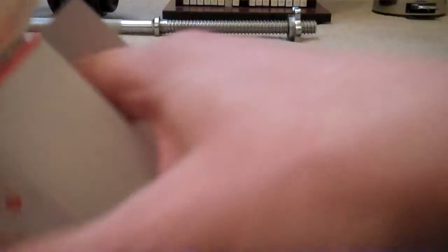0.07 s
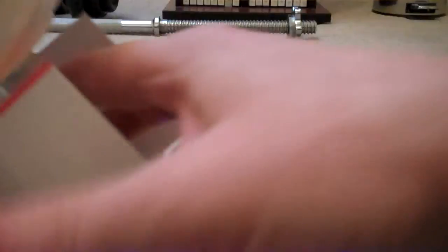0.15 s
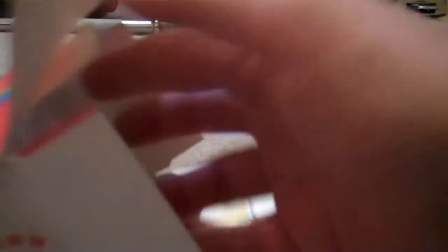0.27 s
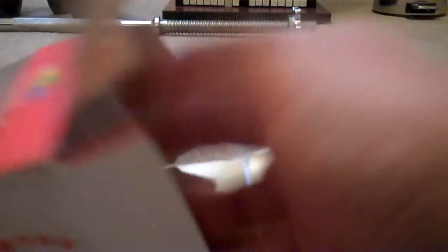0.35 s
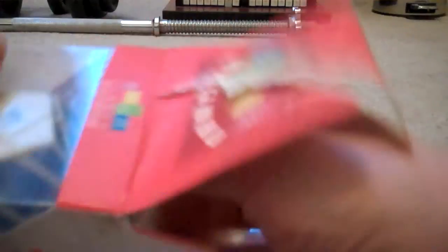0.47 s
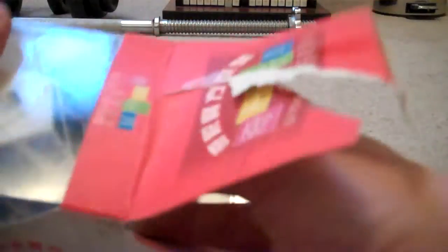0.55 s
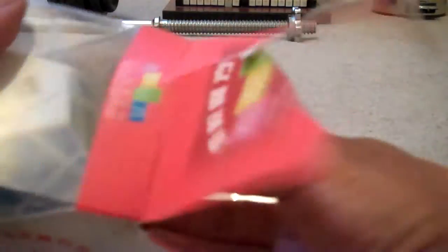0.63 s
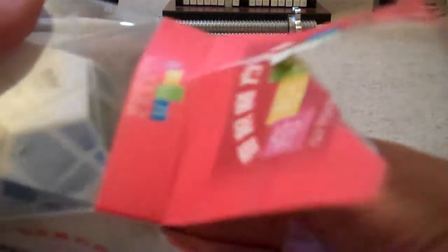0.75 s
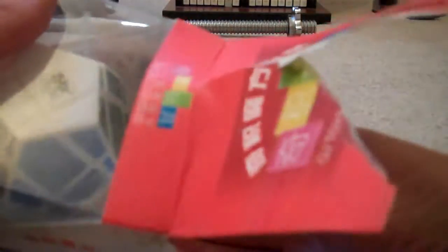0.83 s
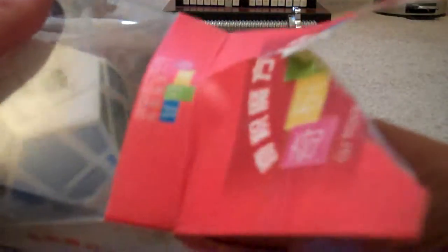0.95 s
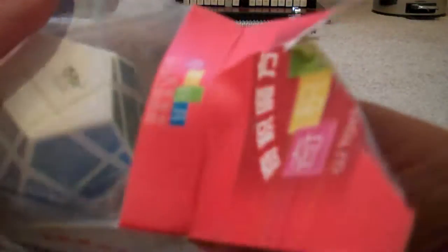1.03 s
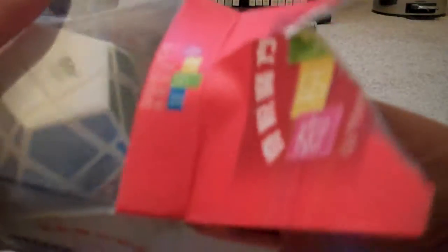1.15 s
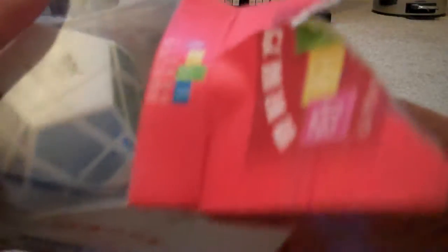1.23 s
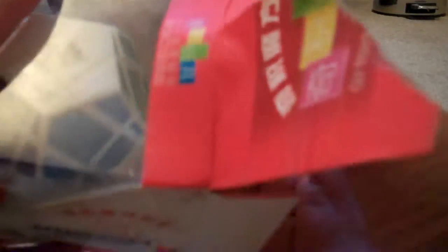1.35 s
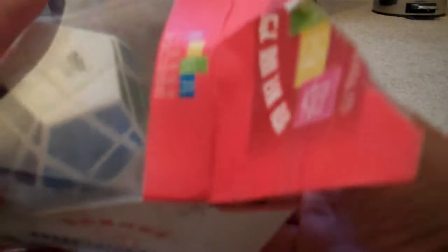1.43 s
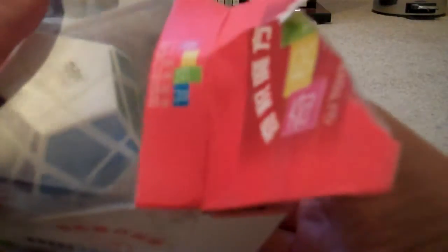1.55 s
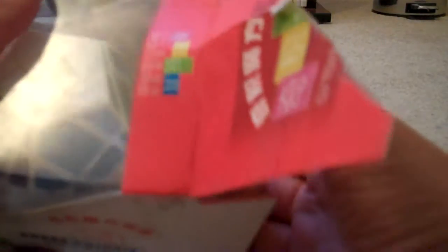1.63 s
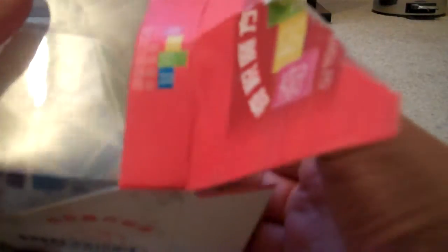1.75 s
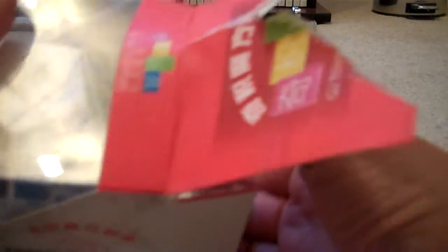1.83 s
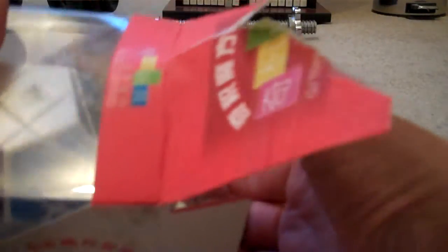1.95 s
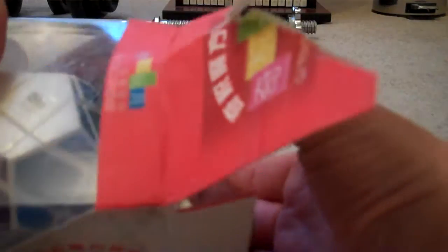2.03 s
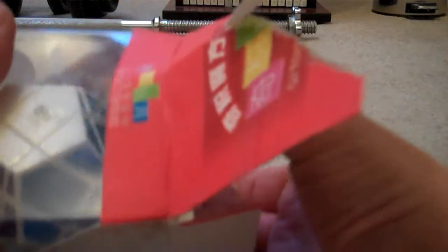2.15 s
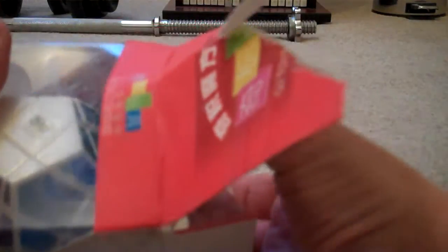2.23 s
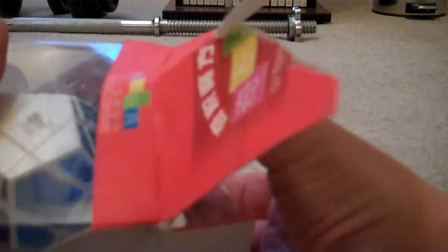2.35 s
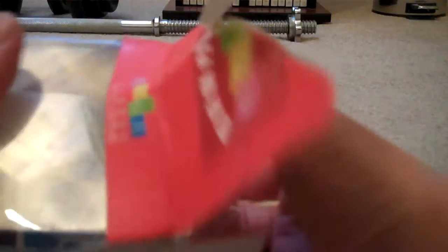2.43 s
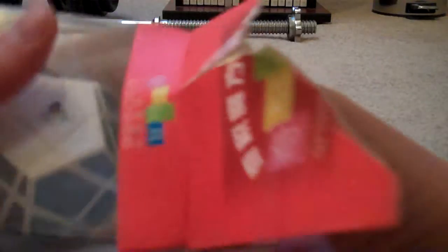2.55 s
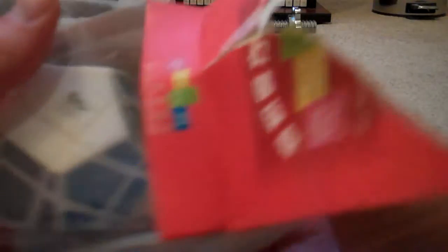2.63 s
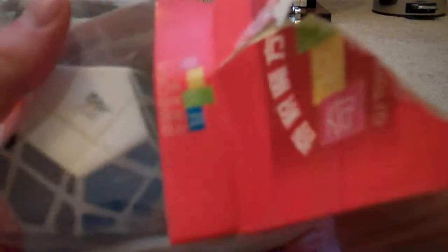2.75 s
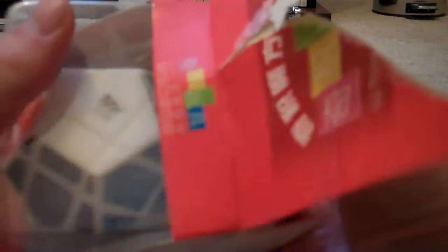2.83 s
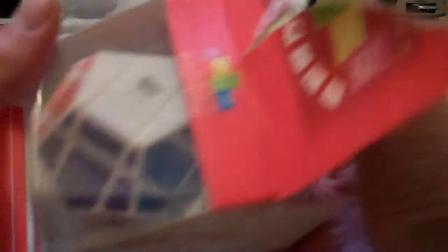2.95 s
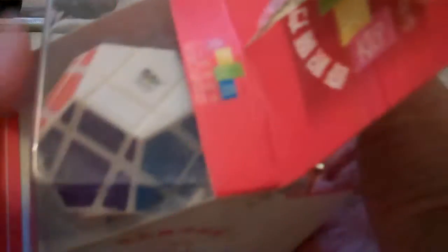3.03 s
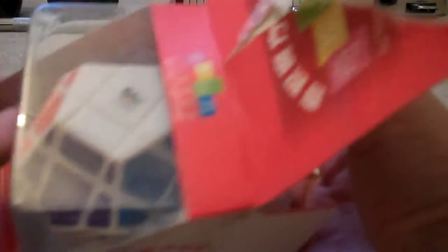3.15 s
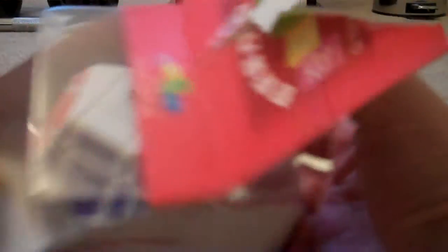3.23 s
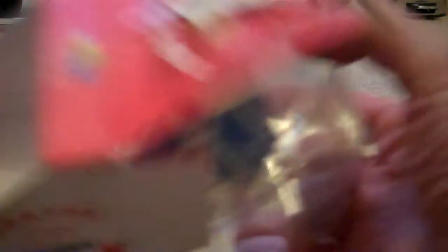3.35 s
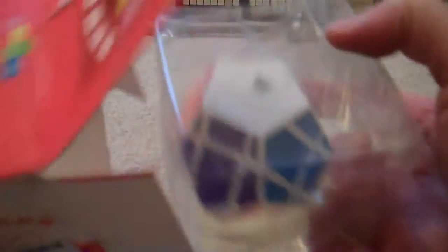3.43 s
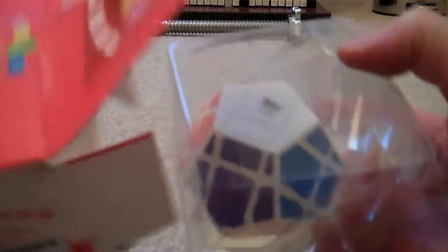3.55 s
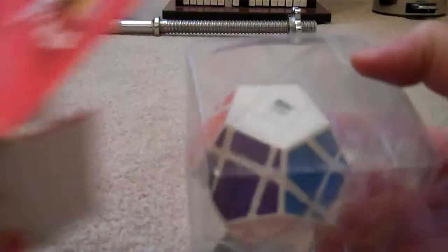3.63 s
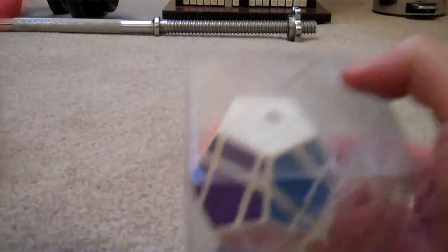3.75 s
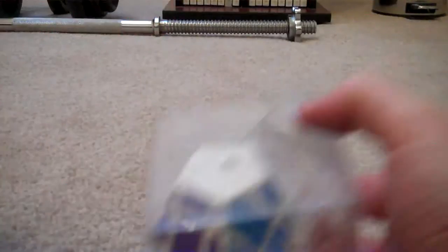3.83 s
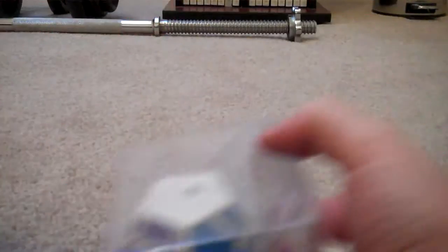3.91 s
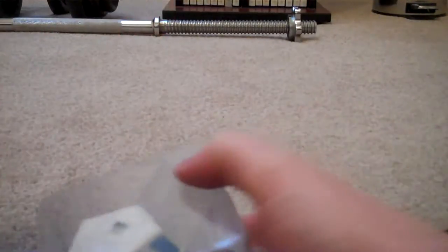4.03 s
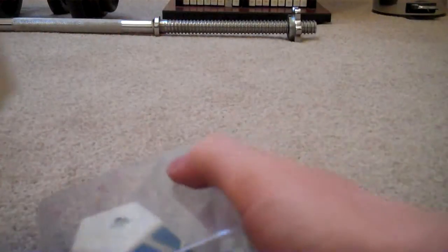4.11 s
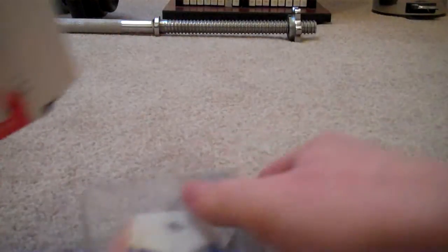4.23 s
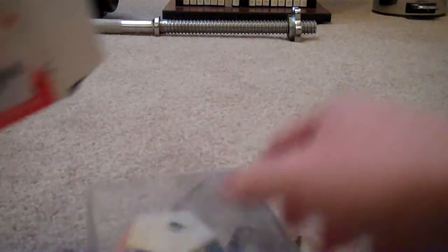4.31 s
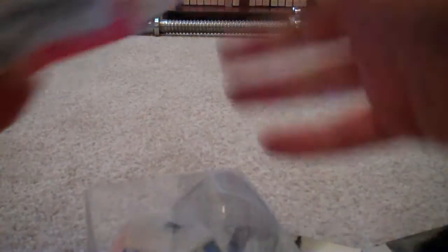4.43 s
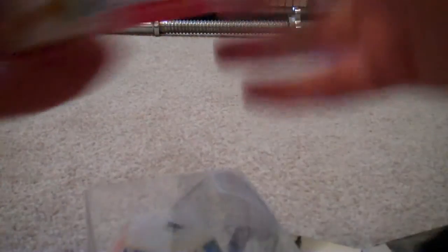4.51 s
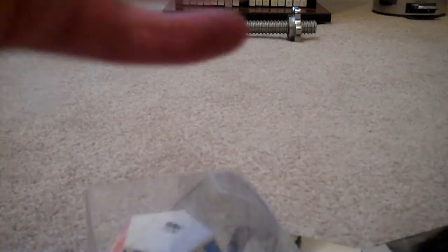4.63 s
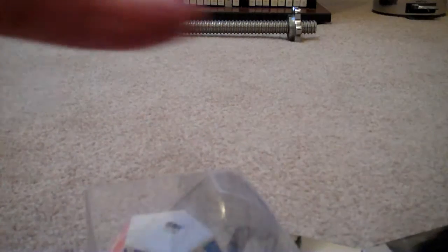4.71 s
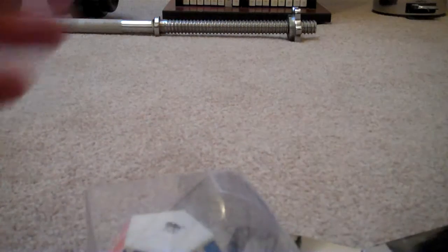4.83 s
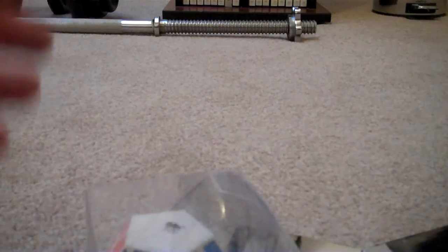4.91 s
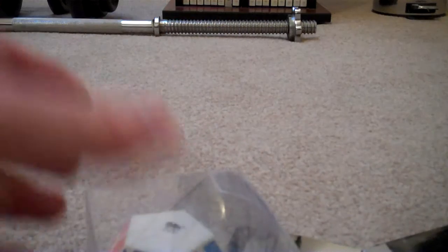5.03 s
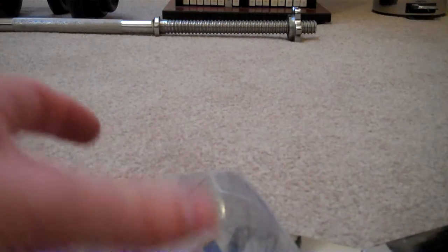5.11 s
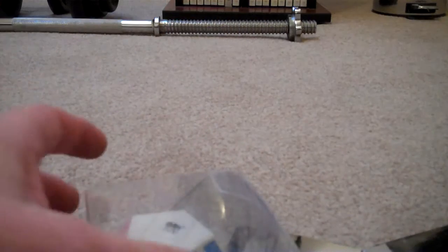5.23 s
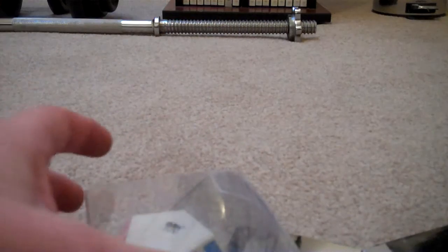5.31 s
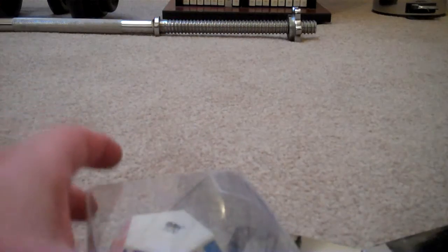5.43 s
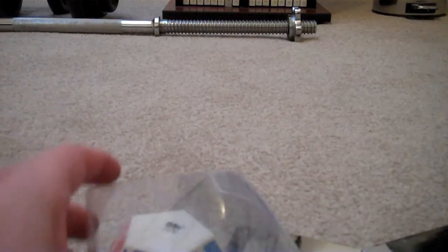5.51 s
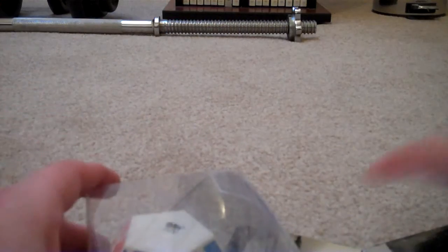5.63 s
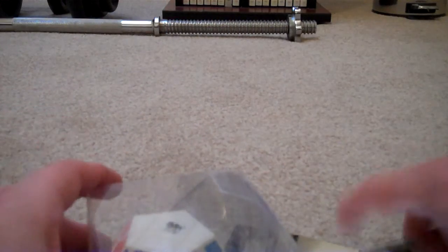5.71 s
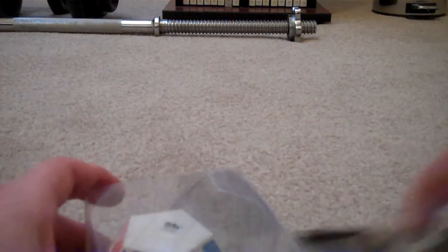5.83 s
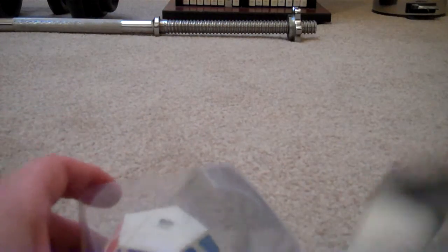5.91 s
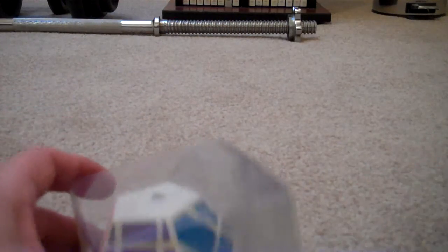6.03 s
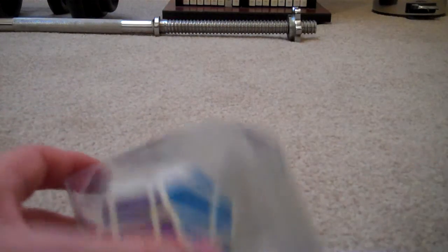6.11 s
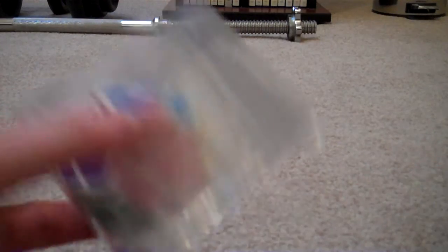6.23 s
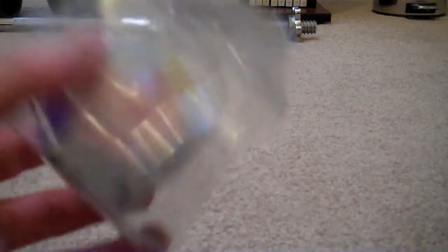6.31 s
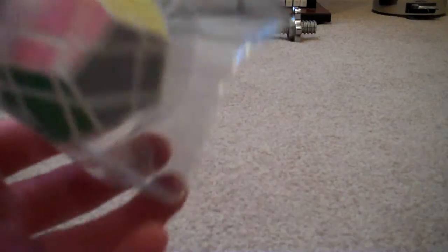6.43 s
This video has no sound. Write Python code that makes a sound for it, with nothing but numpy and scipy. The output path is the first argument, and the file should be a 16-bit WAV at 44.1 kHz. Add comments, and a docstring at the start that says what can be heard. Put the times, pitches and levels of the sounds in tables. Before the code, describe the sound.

Stiff card and crinkly plastic film rustle and snap very close up, some cracks overloading, then a light hollow puzzle bumps softly on carpet.

```python
"""A small carpeted room, heard close up: hands open a cardboard box and slide out a puzzle in a stiff plastic bag.
Card and film rustle as stick-slip noise through shifting resonances; creases pop as short decaying tones.
Folds snap, faint to very loud, as panel modes and noise bursts; the loudest overload the microphone.
The hollow puzzle is nudged on the carpet: damped modes behind soft contacts. A diffuse room tail answers."""
import sys
import numpy as np
from scipy import signal
from scipy.fft import rfft, irfft, next_fast_len
from scipy.io import wavfile
from scipy.ndimage import uniform_filter1d, map_coordinates

SR = 44100
rng = np.random.default_rng(int(sys.argv[2]) if len(sys.argv) > 2 else 0)


def store_wav(level_fs):
    """Save 16-bit WAV to argv[1]."""
    pcm = np.round(np.clip(np.atleast_2d(level_fs), -1, 1) * 32767)
    wavfile.write(sys.argv[1], SR, pcm.T.astype(np.int16))


N = 284886

# steady hush, its colour: f/Hz, density/dB per Hz
HUSH_COLOUR = [(20, -3.5), (60, -7.5), (250, -1), (600, -14), (2000, -19), (7000, -19), (14000, -18),
               (15000, -70)]
# decay of the room: f/Hz, t60/s
ROOM_DECAY = [(200, .29), (600, 0.48), (1400, 0.15), (4000, 0.33), (10000, 0.4)]
# colour of the room tail: f/Hz, level/dB
ROOM_COLOUR = [(100, -3), (300, 1), (480, -4), (630, 3), (880, 4), (1150, 0), (3500, -3), (6500, -6.5),
               (12000, -6.5)]
# likeness of the two microphone ports: f/Hz, correlation (1 = identical)
PORT_LIKENESS = [(100, 0.6), (500, 1.01), (1200, 0.85), (2500, 0.91), (4500, 0.54), (7000, 0.12),
                 (12000, -0.01)]
# tilt between the ports: f/Hz, left minus right/dB
PORT_BALANCE = [(100, 0.5), (300, 0.6), (2600, 0), (4600, -1), (5800, -6.5), (7200, 9), (8500, 10),
                (12000, 9.5)]
# the hands drift to the right, so the left port lags: t/s, lag/s
LEFT_LAG = [(0, 0), (3.4, 0), (3.7, .00002), (4.6, .00002), (5.1, .00006), (6.46, .00006)]
# a flap springs open and pushes air at the ports: t/s, level/dB
PUFFS = [(1.609, -8), (2.169, -24)]
# short resonant swells: the box cavity rings, an edge sings, the bag scuffs on the carpet:
# t/s, time to fall to 1/e/s, f/Hz, -6 dB width/Hz, level/dB
RESONANT_SWELLS = [(1.66, .05, 880, 260, -28), (2.853, 0.028, 2070, 600, -22), (4.24, .03, 215, 110, -35),
                   (4.802, 0.011, 2520, 200, -33), (4.816, .035, 6150, 250, -35),
                   (4.845, .008, 960, 200, -37), (5.33, .035, 115, 50, -49), (5.35, .04, 740, 60, -43),
                   (5.37, .05, 290, 50, -47)]
# card chatters over the film: start t/s, end t/s, slip rate/Hz, typical level/dB
CHATTER = [(1.984, 2.044, 225, -19)]
# modes of the hollow puzzle: f/Hz, level/dB, t60/s
PUZZLE_MODES = [(295, 0, .05), (420, -6, .028), (614, -3, .032), (735, -1, .035), (875, 1, .028),
                (1550, -6, .014), (2300, -7, .011)]
# the puzzle bumps in its bag: t/s, nominal peak/dB, centre f of the blow/Hz, highest f excited/Hz
KNOCKS = [(1.612, -6, 1000, 2800), (5.039, -33, 720, 1000), (5.085, -23, 700, 1000), (5.271, -29, 750, 950),
          (5.308, -19, 780, 950), (5.321, -23, 520, 900), (5.446, -18, 560, 900), (5.456, -20.5, 500, 900),
          (5.521, -28, 680, 900), (5.575, -28.5, 560, 910), (5.734, -32, 700, 900),
          (5.9225, -11.5, 1020, 2800), (6.33, -21, 1100, 2400), (6.405, -10, 440, 2400),
          (6.425, -20, 450, 2400)]
# swells of card and film noise: hand strokes, and a few that linger just after loud snaps: # t of the peak/s,
# half-width/s, card level/dB, film level/dB
RUSTLE_SWELLS = [(0.021, 0.035, -31.0, -25.9), (0.206, 0.012, -35.2, -38.7), (0.328, 0.015, -35.4, -28.5),
                 (0.442, 0.041, -35.5, -25.4), (0.629, 0.061, -38.5, -25.7), (0.823, 0.051, -38.5, -29.0),
                 (0.991, 0.042, -33.2, -20.5), (1.115, 0.025, -25.9, -21.9), (1.339, 0.016, -28.5, -23.7),
                 (1.639, 0.043, -28.1, -25.8), (1.816, 0.024, -26.3, -23.6), (2.05, 0.06, -25.6, -20.2),
                 (2.226, 0.048, -20.6, -20.3), (2.483, 0.029, -20.5, -17.4), (2.775, 0.052, -23.7, -22.3),
                 (2.849, 0.015, -14.7, -11.8), (2.983, 0.048, -30.5, -24.2), (3.348, 0.055, -21.8, -16.2),
                 (3.432, 0.016, -14.6, -17.0), (3.571, 0.015, -37.8, -33.3), (3.989, 0.022, -44.2, -39.1),
                 (4.084, 0.018, -30.3, -28.4), (4.212, 0.035, -31.6, -31.1), (4.311, 0.033, -33.6, -34.3),
                 (4.484, 0.03, -53.6, -43.4), (4.611, 0.025, -26.9, -19.3), (4.797, 0.026, -38.6, -29.9),
                 (5.104, 0.04, -40.9, -33.7), (5.205, 0.02, -52.2, -39.8), (5.311, 0.032, -47.5, -38.4),
                 (5.466, 0.034, -44.7, -38.8), (5.58, 0.022, -47.6, -37.8), (5.822, 0.041, -38.0, -31.5),
                 (5.956, 0.025, -44.6, -40.7), (6.24, 0.02, -43.9, -36.9), (6.355, 0.009, -33.4, -35.4),
                 (6.413, 0.024, -30.2, -32.4)]
# slow creep under the swells, fading once the bag is out of the box: t/s, card level/dB, film level/dB
CREEP = [(0.0, -37.6, -44.3), (0.26, -48.9, -43.1), (0.5, -39.5, -34.4), (1.3, -39.8, -38.1),
         (2.6, -47.5, -41.7), (3.2, -37.5, -34.3), (3.8, -57.3, -53.2), (6.46, -57.5, -53.4)]
# rubbing card, its colour: f/Hz, density/dB per Hz
CARD_RUB = [(25, -41), (90, -20), (180, -7.5), (400, -4), (560, -4.5), (860, 3), (1100, -0.5), (1600, 1),
            (2100, 3.5), (3000, -1), (3800, -3), (5500, -12), (9000, -70)]
# rubbing film, its colour: f/Hz, density/dB per Hz
FILM_RUB = [(1500, -53), (3000, -7.5), (3800, -4.5), (4800, -3.5), (5900, 3), (6600, 1.5), (7400, 1),
            (8600, -9.5), (10500, -19), (14000, -23.5), (14700, -59)]
# modes of the box panels: f/Hz, level/dB, t60/s for a 16 ms thump setting
PANEL_MODES = [(100, -11, .02), (205, -5.5, .026), (360, -2, .02), (530, 1, .017)]
# cracking card, its colour: f/Hz, density/dB per Hz
CARD_SNAP = [(200, -59), (500, -21), (680, -3.5), (880, 2.5), (1100, -5), (1900, 2.5), (2900, -3),
             (3600, -5), (5000, -14), (9000, -68)]
# ticking film, its colour: f/Hz, density/dB per Hz
FILM_SNAP = [(1500, -50), (3000, -6), (3800, -5.5), (5000, 1), (5900, 6), (7400, 1.5), (8700, -10),
             (11000, -19.5), (14000, -25.5), (20000, -65)]
# single folds and ticks, faint to very loud: t/s, thump level/dB, card level/dB, film level/dB
TIMED_FOLDS = [(.0212, -33, -27, -15), (.0257, -25, -21, -4), (.0297, -30, -25, 1), (.6554, -33, -32, -11),
               (.6653, -26, -14, 0), (.7653, -49, -27, -14), (.8068, -45, -19, -21), (.9411, -35, -20, -20),
               (.9902, -46, -25, -5), (1.2279, -14, -4, -7), (1.3068, -25, -7, -15),
               (1.3401, -37, -16, -19), (1.4322, -24, -22, -25), (1.4485, -24, -3, -2),
               (1.4719, -41, -11, -26), (1.5155, -55, -24, -17), (1.5435, -15, 2, 3), (1.6083, -13, 5, 5),
               (1.7678, -54, -16, -6), (1.816, -39, -18, -4), (1.8304, -40, -22, -12),
               (1.9005, -57, -29, -17), (2.05, -40, -10, -2), (2.0688, -28, -3, 4), (2.1498, -47, -40, -16),
               (2.1679, -18, 7, 6), (2.1889, -37, -13, -17), (2.23, -37, -16, -14), (2.2843, -46, -19, -12),
               (2.3833, -48, -19, -10), (2.4754, -46, -32, -7), (2.4891, -44, -11, -13),
               (2.6673, -27, -17, -21), (2.6855, -17, -3, 0), (2.8019, -47, -13, -13),
               (2.8698, -26, -5, -4), (3.0206, -47, -15, -21), (3.073, -29, -18, -19),
               (3.1105, -48, -27, -9), (3.132, -51, -30, -15), (3.1765, -54, -27, -13),
               (3.2075, -10, 0, -2), (3.307, -37, -13, -21), (3.369, -29, -12, -14), (3.3919, -37, -5, -12),
               (3.409, -30, -4, -20), (3.4166, -23, -16, -24), (3.4357, -27, -12, 4), (3.4455, -27, -5, -2),
               (3.565, -51, -35, -22), (3.5925, -42, -22, -15), (3.6556, -49, -34, -42),
               (3.7426, -63, -55, -33), (4.1115, -35, -25, -41), (4.2164, -19, -10, 0),
               (4.236, -27, -32, -18), (4.28, -29, -14, -15), (4.5967, -35, -19, -20),
               (4.8428, -49, -35, -31), (5.0448, -47, -33, -21), (5.0864, -40, -27, -22),
               (6.3287, -33, -22, -27)]

TOP_HZ = 16000
# a rustle swell is this far down at one half-width from its peak; the exponent rounds its top
SWELL_FALL_DB, SWELL_ROUNDNESS = 4, 1.5
# base decay of a fold at 0 dB of card, scaled for each layer; louder card rings longer
SNAP_BASE_T60_S, T60_DOUBLES_DB = .018, 55
# random folds: density, scatter, and levels over the rustle (thump, card, film)
RANDOM_FOLDS_PER_S, RANDOM_SCATTER_DB, RANDOM_FOLD_DB = 11, 2.5, (-10, 4, 6)


def amp(db):
    """Decibels to gain."""
    return 10 ** (np.asarray(db) / 20)


def unit(x):
    """Scale to rms 1."""
    return x / np.sqrt(np.mean(x ** 2) + 1e-20)


def along(points, hz):
    """Read (Hz, value) points on a log frequency axis."""
    f, value = np.transpose(points)
    return np.interp(np.log(hz + 1), np.log(f + 1), value)


def wobble(rate):
    """A smooth random curve with rate knots a second."""
    knots = rng.standard_normal(int(N * rate / SR) + 4)
    return map_coordinates(knots, [np.arange(N) * rate / SR])


def filtered(x, response):
    """Shape x by a gain that depends on frequency."""
    n = x.shape[-1]
    padded = next_fast_len(n + n // 8)
    gain = response(np.fft.rfftfreq(padded, 1 / SR))
    return irfft(rfft(x, padded) * gain, padded)[..., :n]


def add(track, s, sound):
    """Mix a sound into the track at time s."""
    start = max(0, round(s * SR))
    part = track[..., start:start + sound.shape[-1]]
    part += sound[..., :part.shape[-1]]


def to_stereo(pair, spectrum):
    """Colour two unrelated signals and blend them as mid and side until the ports are as alike as they should be."""
    def mid_side_gain(hz):
        turn = np.arccos(np.clip(along(PORT_LIKENESS, hz), -1, 1)) / 2
        return amp(along(spectrum, hz)) * [np.cos(turn), np.sin(turn)]

    mid, side = filtered(pair, mid_side_gain)
    return np.array([mid + side, mid - side])


def spread(pair, spectrum):
    """Coloured stereo at rms 1, with the high treble nearly unrelated between the ports."""
    return unit(to_stereo(pair, spectrum))


def hush():
    """A faint steady bed of coloured noise."""
    return amp(-61.5) * spread(rng.standard_normal((2, N)), HUSH_COLOUR)


def room(x, delay):
    """A diffuse tail of decaying noise, new for every stretch of time because the hands keep moving."""
    out, step = np.zeros((2, N)), SR // 3
    for start in range(0, N, step):
        hz, t, noise = signal.stft(rng.standard_normal((2, SR // 2)), SR, nperseg=256)
        decay = amp(-60 * t / along(ROOM_DECAY, hz)[:, None])
        tail = signal.istft(noise * decay, SR, nperseg=256)[1]
        tail = tail / np.linalg.norm(tail[0])
        add(out, start / SR + delay, signal.fftconvolve(x[:, start:start + step], tail, axes=1))
    return to_stereo(out, ROOM_COLOUR)


def puffs():
    """One push of air and its slower return, nearer to the left port."""
    out, u = np.zeros(N), np.arange(SR // 10) / SR / .0035
    for s, db in PUFFS:
        add(out, s, amp(db) * u * (2 - u) * np.exp(-u))
    return out * amp([[3], [-3]])


def resonant_swells():
    """Noise in one narrow resonance swells and fades: a cavity ring, a singing edge or a scuff on the carpet."""
    out, t = np.zeros(N), np.arange(-SR // 8, SR // 8) / SR
    for s, length, centre_hz, width_hz, db in RESONANT_SWELLS:
        noise = rng.standard_normal(len(t))
        tone = filtered(noise, lambda hz: 1 / (1 + (2 * (hz - centre_hz) / width_hz) ** 2))
        swell = np.exp(-(t / length) ** 2)
        add(out, s + t[0], amp(db) * swell * unit(tone))
    return out


def ripple(hz, depth_db, width_hz):
    """The uneven resonances of a bent sheet in dB, new for each shape that it takes."""
    return depth_db * map_coordinates(rng.standard_normal(size=64), [hz / width_hz], mode="mirror")


def burst(spectrum, t60, rise):
    """A sheet's crowded modes, struck once, as decaying noise; level 1 is its energy packed into 3 ms."""
    t = np.arange(SR // 30) / SR
    shape = (1 - np.exp(-(t / rise) ** 2)) * amp(-60 * t / t60)
    noise = rng.standard_normal((2, len(t)))
    modes = filtered(noise, lambda hz: amp(ripple(hz, depth_db=2.2, width_hz=551)))
    return unit(shape * spread(modes, spectrum)) * np.sqrt(.003 / t[-1])


def chatter():
    """An edge catches and lets go at a nearly even rate, ticking the film."""
    out = np.zeros((2, N))
    for start, end, rate, db in CHATTER:
        for s in np.arange(start, end, 1 / rate):
            jitter, size = rng.standard_normal(2)
            tick = burst(FILM_SNAP, t60=.006, rise=.0007)
            add(out, s + .12 * jitter / rate, amp(db + 2.1 * size) * tick)
    return out


def knocks():
    """Each bump rings the puzzle's modes; a soft contact starts slowly and leaves the high ones nearly still."""
    out, t = np.zeros(N), np.arange(SR // 5) / SR
    hz, mode_db, t60 = np.transpose(PUZZLE_MODES)[:, :, None]
    for s, db, centre_hz, top_hz in KNOCKS:
        strength, detune, phase = rng.standard_normal((3, len(PUZZLE_MODES), 1))
        octaves_off = np.abs(np.log2(hz / centre_hz))
        weight = amp(mode_db + strength - 9 * octaves_off) / (1 + (hz / top_hz) ** 6)
        swing = np.sin(2 * np.pi * (hz * (1 + .04 * detune) * t + phase))
        contact = 1 - np.exp(-(t * top_hz / 1.4) ** 2)
        ring = np.sum(weight * amp(-60 * t / t60) * swing, axis=0)
        add(out, s, amp(db - 20) * unit(contact * ring))  # rms over 0.2 s sits 20 dB under the nominal peak
    # the bumps carry little below about 190 Hz
    return signal.sosfilt(signal.butter(2, 190, "highpass", fs=SR, output="sos"), out)


def rustle_levels():
    """Card and film levels in dB: each swell rises and falls evenly about its peak, over a slow creep."""
    t = np.arange(0, N, 32) / SR
    peak, width, *swell_db = np.transpose(RUSTLE_SWELLS)
    s, *creep_db = np.transpose(CREEP)
    off_peak = np.abs((t - peak[:, None]) / width[:, None])
    swells = amp(-SWELL_FALL_DB * off_peak ** SWELL_ROUNDNESS)
    creep = amp([np.interp(t, s, db) for db in creep_db])
    power = amp(swell_db) ** 2 @ swells ** 2 + creep ** 2
    return [np.interp(np.arange(N) / SR, t, 10 * np.log10(p)) for p in power]


def slips(rate, scatter_db, t60):
    """Power of many tiny stick-slip releases of uneven size, evened to a local mean of 1."""
    sizes = amp(scatter_db * np.clip(rng.standard_normal(N), -2, 2)) ** 2
    kicks = sizes * (rng.random(N) < rate / SR)
    power = signal.lfilter([1], [1, -amp(-60 / (t60 * SR)) ** 2], kicks)
    return power / (np.abs(uniform_filter1d(power, size=2200)) + 1e-9)


def flexing(depth_db):
    """Noise through resonances that shift as the sheet bends, a new set every tenth of a second or so."""
    noise = signal.stft(rng.standard_normal((2, N)), nperseg=1024)[2]
    # knots 3 bins and 11 frames apart
    knots = np.indices(noise.shape[1:]) / np.reshape([3, 11], (2, 1, 1))
    field = map_coordinates(rng.standard_normal(noise.shape[1:]), knots)
    return signal.istft(noise * amp(depth_db * field), nperseg=1024)[1][:, :N]


def crinkles(rate, scatter_db, centre_hz, cycles):
    """Small creases pop at random as decaying tones, each with a pitch of its own; rms 1."""
    count = int(rate * N / SR)
    when, chance, balance = rng.random((3, count, 1))
    hz = np.clip(centre_hz * np.exp(.5 * rng.standard_normal((count, 1))), 700, 9000)
    t = np.arange(SR // 80) / SR
    strength = amp(-scatter_db * np.log(chance + .04)) * np.sqrt(hz)
    shape = amp(-60 * t * hz / cycles) * (1 - np.exp(-t * hz))
    pops = strength * np.sin(2 * np.pi * hz * t) * shape
    index = ((when * N).astype(int) + np.arange(len(t))).ravel()
    sides = [np.bincount(index, (pops * gain).ravel(), N)[:N] for gain in (1 + balance, 2 - balance)]
    return unit(np.array(sides))


def rubbing(card_db, film_db):
    """Card scrapes on card and film slides along it: hiss, crackle and popping creases."""
    shared = slips(rate=200, scatter_db=4.5, t60=.010)  # both sheets feel these releases
    grip = wobble(45)  # the pressure of the fingers is never even
    card, film = amp(card_db + 1.2 * grip), amp(film_db + .7 * grip)

    def sheet(spectrum, crackle):
        """Flexing noise, gated partly by slips and partly steady."""
        own = slips(rate=600, scatter_db=4.5, t60=.007)
        texture = np.sqrt(1 - crackle + crackle * (shared + own) / 2)
        return spread(texture * flexing(depth_db=3), spectrum)

    creases = amp(-7.5) * crinkles(rate=170, scatter_db=5, centre_hz=2100, cycles=10)
    scrape = amp(-1.5) * sheet(CARD_RUB, crackle=.75)
    return card * (scrape + creases) + film * sheet(FILM_RUB, crackle=.42)


def thump(t60):
    """A panel flips and swings a few times in damped modes; level 1 is its energy packed into 3 ms."""
    t = np.arange(SR // 12) / SR
    hz, db, decay = np.transpose(PANEL_MODES)[:, :, None]
    strength, detune, phase = rng.standard_normal((3, len(PANEL_MODES), 1))
    swing = np.sin(2 * np.pi * (hz * np.exp(.12 * detune) * t + phase))
    ring = np.sum(amp(db + strength - 60 * t / (decay * t60 / .016)) * swing, axis=0)
    return unit(ring * (1 - np.exp(-t / .0015))) * np.sqrt(.003 / t[-1])


def snap(thump_db, card_db, film_db):
    """A fold flips over: the panel thumps, the card cracks and the film ticks."""
    t60 = SNAP_BASE_T60_S * 2 ** (card_db / T60_DOUBLES_DB)
    out = np.tile(amp(thump_db) * thump(1.15 * t60), (2, 1))
    add(out, 0, amp(card_db) * burst(CARD_SNAP, 1.18 * t60, rise=.00082))
    add(out, 0, amp(film_db) * burst(FILM_SNAP, .8 * t60, rise=.0011))
    return out


def random_folds(card_db, film_db):
    """Further folds give way at random, with levels that follow the rustle."""
    out, count = np.zeros((2, N)), int(RANDOM_FOLDS_PER_S * N / SR)
    for slot in range(count):
        at = int((slot + rng.random()) * N / count)
        size_db = RANDOM_SCATTER_DB * np.clip(rng.standard_normal(3), -2, 2)
        rustle_db = np.array([card_db[at], card_db[at], film_db[at]])
        add(out, at / SR, snap(*(size_db + RANDOM_FOLD_DB + rustle_db)))
    return out


def timed_folds():
    """The timed folds, one snap each."""
    out = np.zeros((2, N))
    for s, *levels_db in TIMED_FOLDS:
        add(out, s, snap(*levels_db))
    return out


def scene():
    """Packaging and puzzle in the room, over a faint steady hush."""
    card_db, film_db = rustle_levels()
    rustle = rubbing(card_db, film_db) + chatter() + resonant_swells()
    bumps = knocks()
    folds = timed_folds() + random_folds(card_db, film_db)
    echo = room(amp(-15) * folds + amp(-16) * rustle + amp(-14) * bumps, delay=.0044)
    left, right = folds + rustle + bumps + puffs()
    lag = np.interp(np.arange(N) / SR, *np.transpose(LEFT_LAG))
    left = map_coordinates(left, [np.arange(N) - lag * SR])
    return np.array([left, right]) + echo + hush()


def record(dry):
    """Each port colours the treble its own way; loud snaps clip at full scale, then the top is cut off."""
    ports = filtered(dry, lambda hz: amp(np.outer([.5, -.5], along(PORT_BALANCE, hz))))
    clipped = np.clip(ports, -1, 1)
    return filtered(clipped, lambda hz: hz < TOP_HZ)


dry = scene()
out = record(dry)
store_wav(out)
```